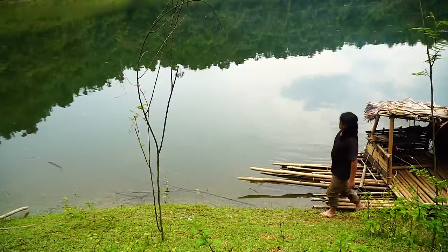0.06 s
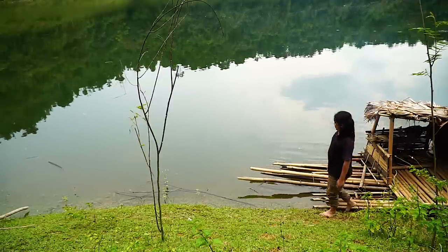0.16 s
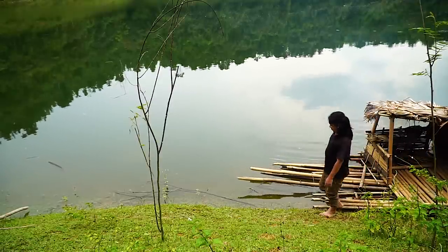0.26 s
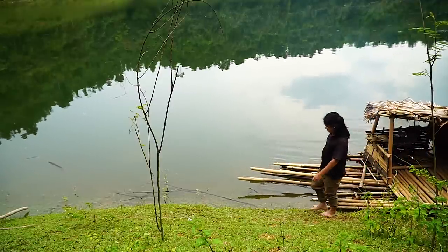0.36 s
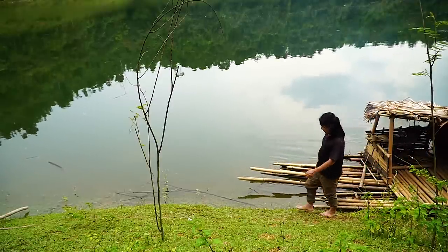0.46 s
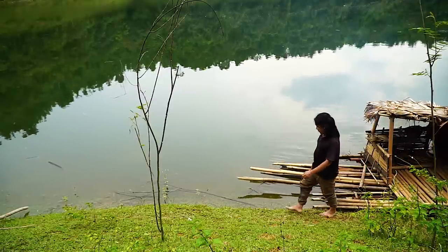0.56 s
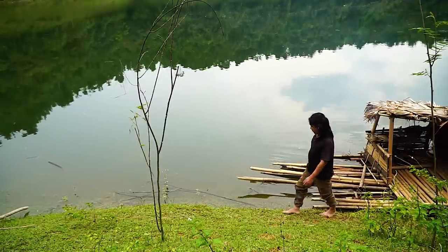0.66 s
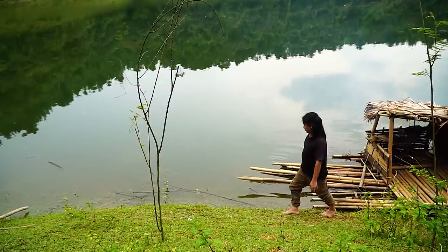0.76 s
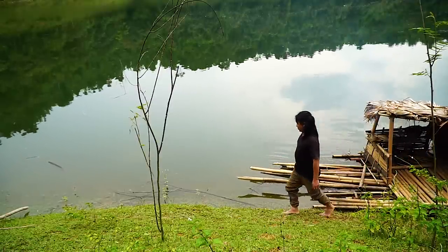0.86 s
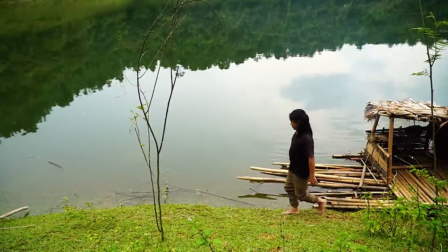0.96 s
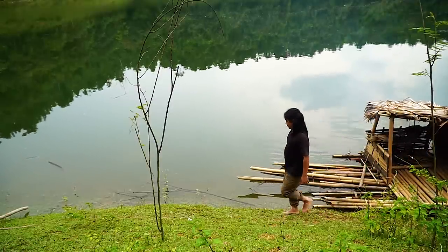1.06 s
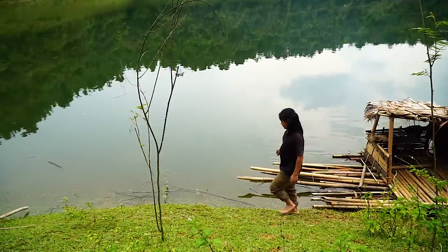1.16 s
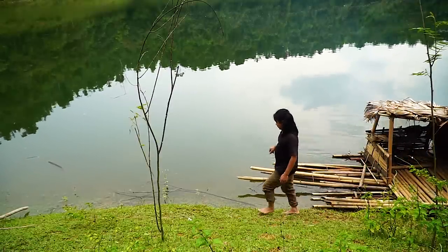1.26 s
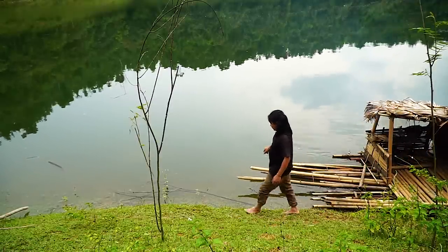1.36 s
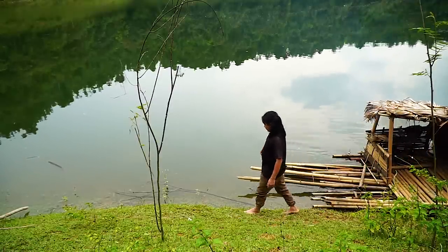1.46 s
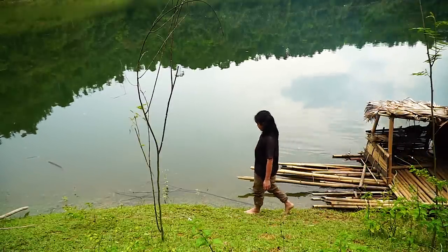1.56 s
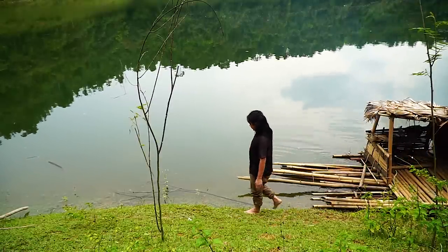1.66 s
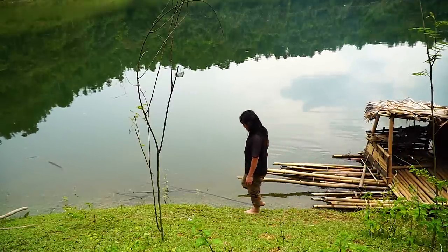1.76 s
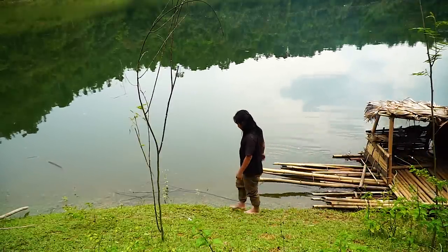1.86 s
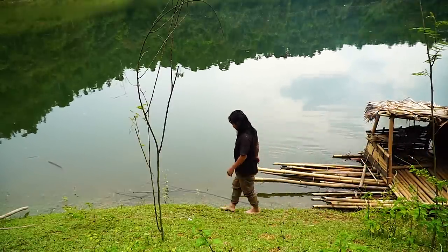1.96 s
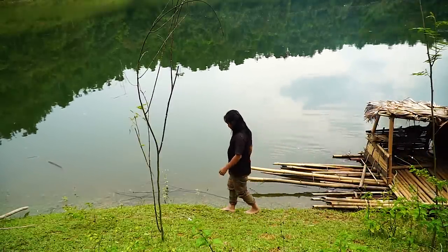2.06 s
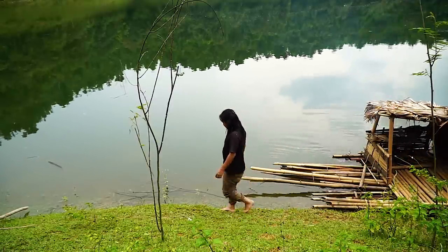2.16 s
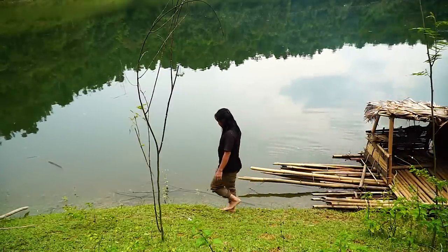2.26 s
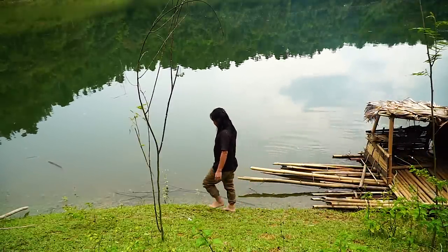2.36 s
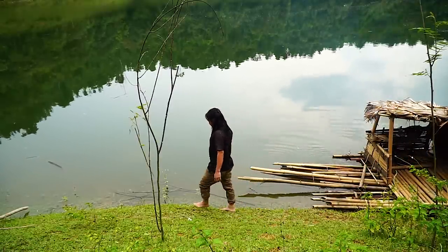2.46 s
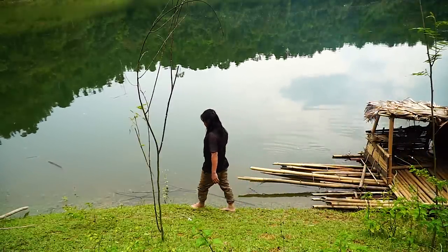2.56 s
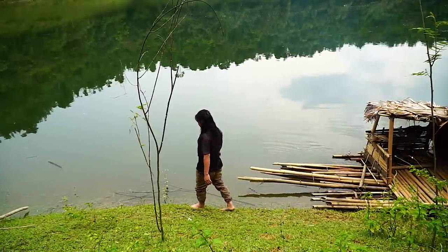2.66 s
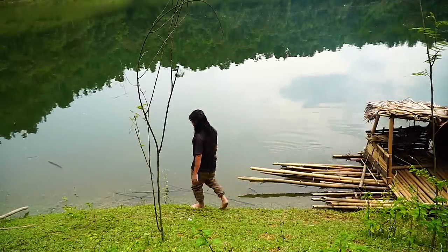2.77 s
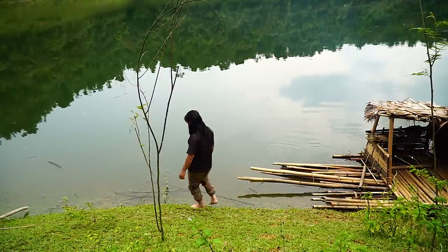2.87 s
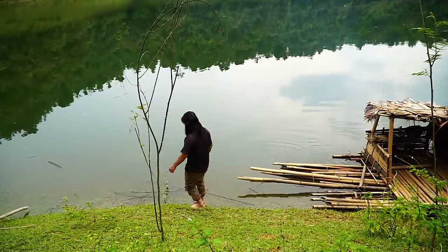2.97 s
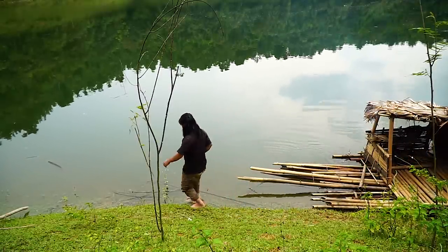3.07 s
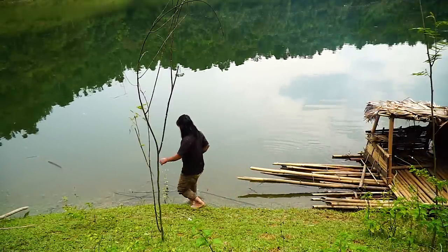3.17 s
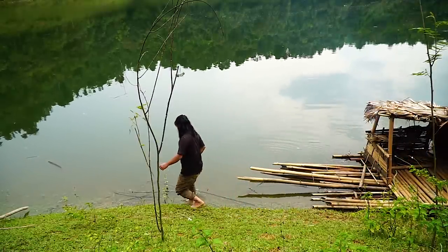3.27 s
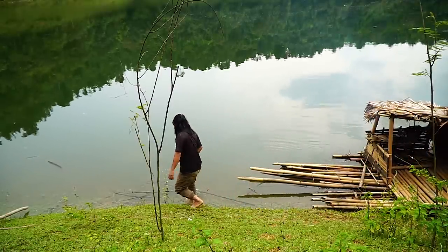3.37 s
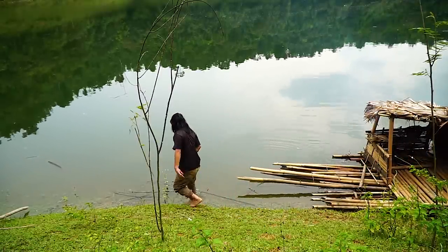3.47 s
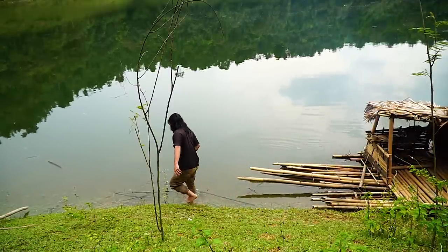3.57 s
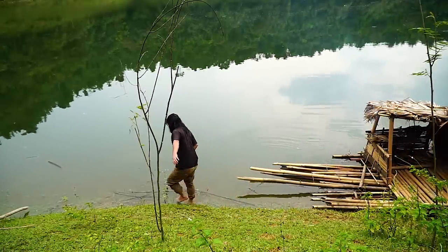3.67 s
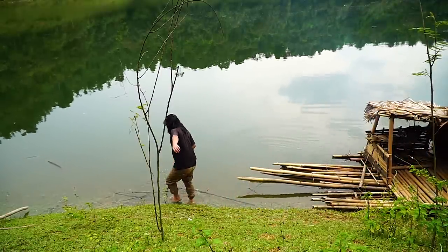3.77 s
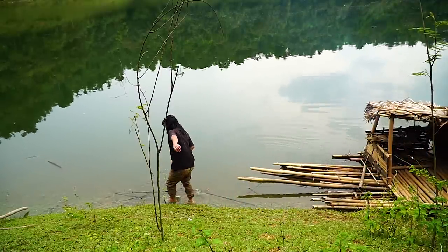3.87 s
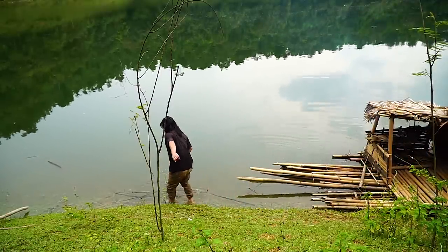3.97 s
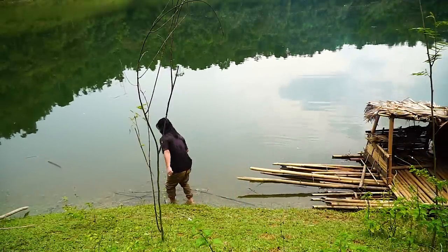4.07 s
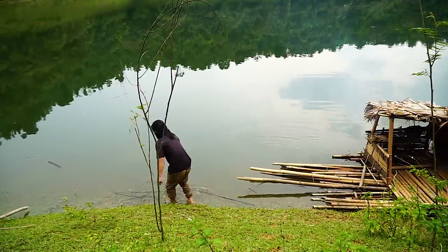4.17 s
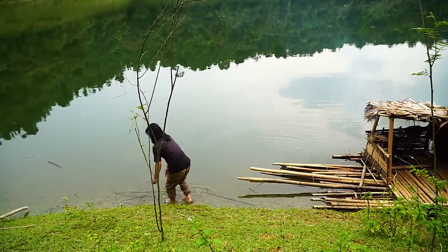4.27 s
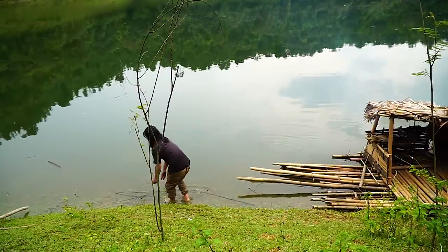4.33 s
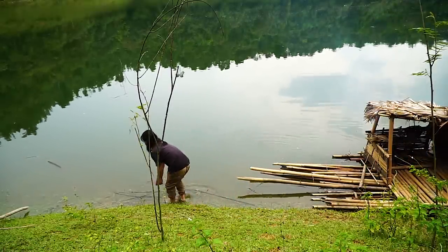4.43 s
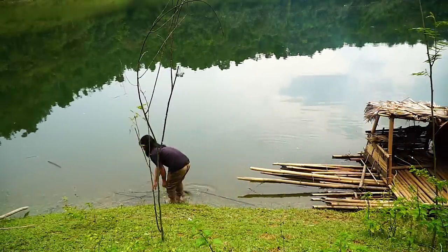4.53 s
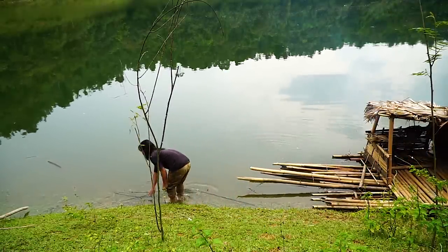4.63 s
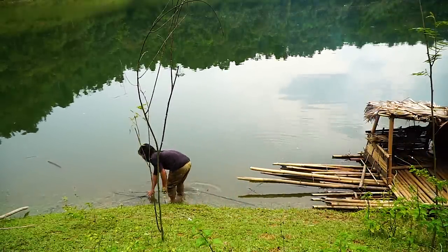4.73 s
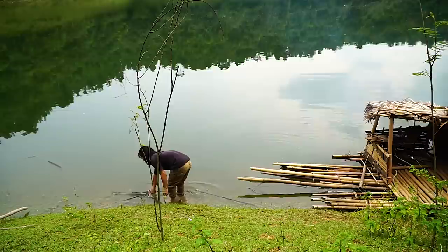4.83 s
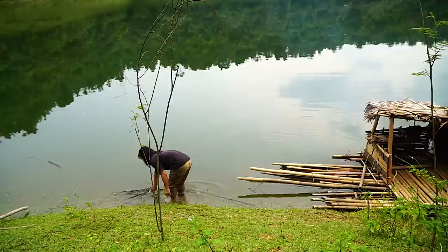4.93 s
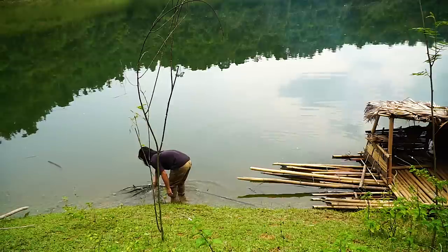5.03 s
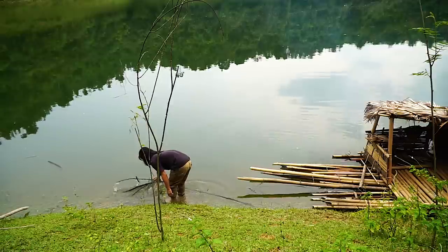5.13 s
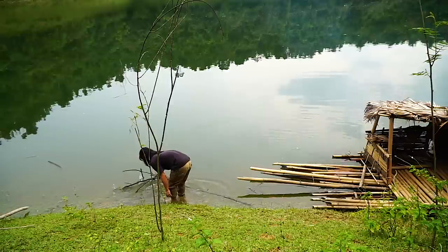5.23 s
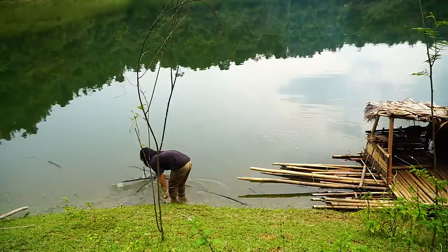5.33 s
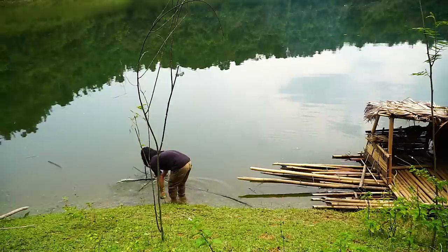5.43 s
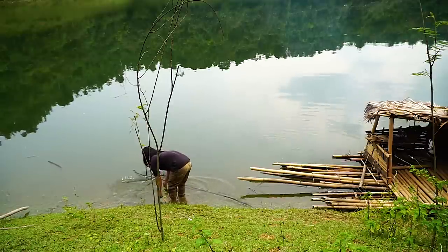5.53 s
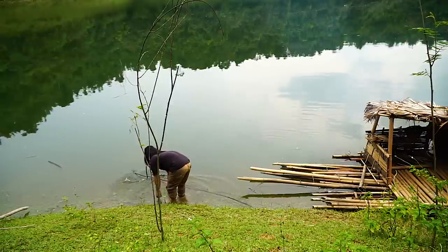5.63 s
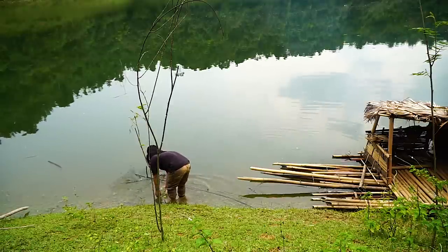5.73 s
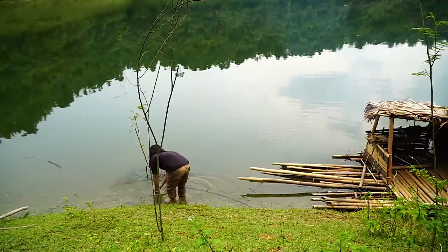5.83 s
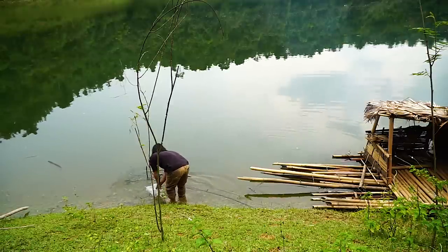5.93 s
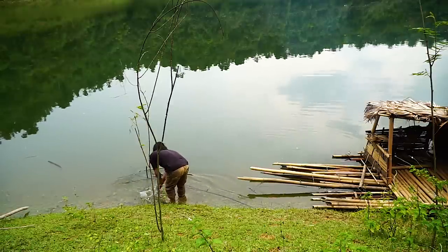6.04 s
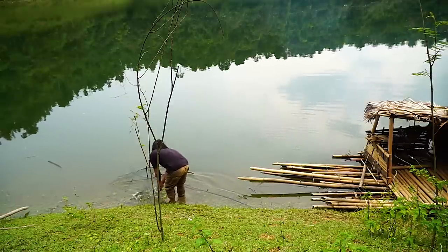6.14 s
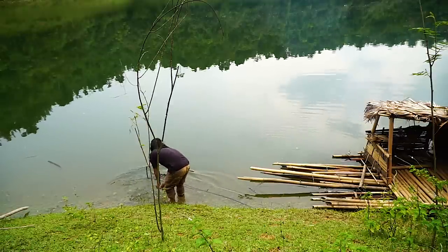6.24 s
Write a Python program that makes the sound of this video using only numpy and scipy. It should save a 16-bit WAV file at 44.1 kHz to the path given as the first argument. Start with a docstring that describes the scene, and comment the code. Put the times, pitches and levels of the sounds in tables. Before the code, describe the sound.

On a quiet outdoor shore, a near insect chirps rapidly over a faint insect chorus and still air. Faint barefoot thuds and grass rustle come first, then a quick splash as feet enter water at about three seconds. Drips, trickling and faint bird notes follow, before hands swish the shallows in fuller, gurgling sloshes until the end. The microphone is fairly near, with little echo.

```python
"""A quiet lake shore: someone walks barefoot down a grassy bank, steps in and swishes something in the shallows.
The water is made of ringing bubbles, low in the slosh and high in the splash, with noise for spray, slaps and drops.
Filtered noise brushes like cloth and grass, and the feet thud softly. A near insect chirps nine times a second.
A far bird, an insect chorus, still air and a breeze lie behind. The ground reflects the water to the microphone."""
import sys
import numpy as np
from scipy import signal
from scipy.fft import rfft, irfft
from scipy.io import wavfile
from scipy.ndimage import uniform_filter1d

SR = 44100
rng = np.random.default_rng(int(sys.argv[2]) if len(sys.argv) > 2 else 0)


def to_wav(sig):
    """Store sig (one row per channel, or 1-D mono) as 16-bit WAV at the path in sys.argv[1].

    Samples outside -1..1 are clipped; the rate is SR.
    """
    pcm = np.clip(np.atleast_2d(sig), -1, 1) * 32767
    pcm = np.round(pcm).astype(np.int16)
    wavfile.write(sys.argv[1], SR, pcm.T)  # frames by channels


N = 277830  # length of the scene [samples]
PUSH_ATTACK_S = 0.031  # time a push through the water takes to climb its last 20 dB


def undb(db):
    """Turn decibels into a gain."""
    return 10 ** (np.asarray(db) / 20)


def unit(x):
    """Scale a sound to an rms of 1."""
    return x / np.sqrt(np.mean(x ** 2))


def add(out, s, sound):
    """Mix a sound in at time s, cut off where the scene ends."""
    i = int(np.clip(s * SR, 0, N))
    out[i:i + len(sound)] += sound[:N - i]


def noise():
    """White noise as long as the scene: every pitch at once."""
    return rng.standard_normal(N)


def colour(x, points):
    """Filter x by a curve of (pitch [Hz], gain [dB]) points."""
    hz, db = np.transpose(points)
    f = np.maximum(np.fft.rfftfreq(N, 1 / SR), 1)
    gain = undb(np.interp(np.log(f), np.log(hz), db))
    return irfft(rfft(x) * gain, N)


def band(x, lo_hz, hi_hz, order=2):
    """Keep the pitches between two edges, with gentle slopes outside them."""
    edges = [lo_hz, min(hi_hz, SR / 2 - 1)]
    return signal.sosfilt(signal.butter(order, edges, "band", fs=SR, output="sos"), x)


def wander(rate):
    """A smooth random curve with spread 1, drawing about `rate` new values a second."""
    k = int(SR / rate)
    stairs = np.repeat(rng.standard_normal(N // k + 1), k)
    return unit(uniform_filter1d(stairs, k)[:N])


def gesture(s, attack, hold, release):
    """Power of one movement: full from s through the hold, 20 dB down one attack before and one release after."""
    t = np.arange(N) / SR - s
    away = np.maximum(-t, 0) / attack + np.maximum(t - hold, 0) / release
    return undb(-20 * np.minimum(away, 10)) ** 2


def bubble(hz, cycles, rise, swell=0.14, pinch=0):
    """A dying ring, peak about 1; its pitch settles after a bubble pinches off and climbs near the surface."""
    pinch_cycles = 4.2  # how long the pitch takes to settle
    cycles = max(cycles, 2)  # until 60 dB down
    turns = np.arange(int(cycles / hz * SR)) * hz / SR
    age = turns / cycles
    envelope = (1 - np.exp(-turns / swell)) * np.exp(-np.log(1000) * age)
    settling = pinch * pinch_cycles * (1 - np.exp(-turns / pinch_cycles))
    phase = turns * (1 - pinch / 2 + rise * age / 2) + settling
    return envelope / envelope.max() * np.sin(2 * np.pi * phase)


def burst(t60, lo_hz, hi_hz, order=2):
    """A short noise with peak 1, dying by 60 dB in t60 seconds."""
    t = np.arange(SR // 8) / SR
    dying = rng.standard_normal(len(t)) * np.exp(-np.log(1000) * t / t60)
    y = band(dying, lo_hz, hi_hz, order)
    return y / np.abs(y).max()


def cloud(db, lowest, hi_hz, cycles, rise, swell, scatter_db, busy_db, tilt_db, count):
    """Up to count bubbles a second at a level near db; below busy_db, calmer water makes fewer of them."""
    out, total = np.zeros(N), count * N // SR
    when, keep, size, life, loud = rng.random((total, 5)).T
    at = ((np.arange(total) + when) / total * (N - 1)).astype(int)
    share = np.minimum(1, undb(db[at] - busy_db))
    hz = np.broadcast_to(lowest, N)[at] ** (1 - size) * hi_hz ** size
    # scatter makes bubbles uneven; tilt favours the high ones, or the low ones if negative
    gain = undb(db[at] + scatter_db * (2 * loud - 1) + tilt_db * (size - .5))
    for k in np.flatnonzero(keep < share):
        ring = bubble(hz[k], cycles * 2 ** (2 * life[k] - 1), rise * 2 * life[k], swell)
        # fewer or shorter rings are each made louder, to hold the level
        even = np.sqrt(SR / (count * share[k] * np.sum(ring ** 2)))
        add(out, at[k] / SR, gain[k] * even * ring)
    return out


def water():
    """Big bubbles slosh, small ones splash, spray crackles, drops fall back."""
    slosh_db, splash_db, spray_db, lowest = stirring()
    moving = sloshing(slosh_db, lowest) + splashing(splash_db) + spraying(spray_db)
    return moving + trickle() + plunging() + single_bubbles() + slapping() + dripping()


def stirring():
    """Each push swells and settles; returns slosh, splash and spray in dB and the pitch of the biggest air pockets."""
    # a foot or hand pushes through the water: (time [s], hold [s], release [s],
    # slosh level [dB], splash level [dB], spray level [dB], lowest bubble pitch [Hz])
    pushes = [(3.069, 0.017, 0.04, -65, -54, -65, 670), (3.095, 0.018, 0.038, -42.5, -48, -83, 498),
              (3.151, 0.051, 0.031, -45, -52.5, -71.5, 617), (3.24, 0.027, 0.072, -57, -57, -82, 710),
              (3.354, 0.056, 0.038, -59.5, -63, -70.5, 684), (4.575, 0.026, 0.42, -50, -60, -73.5, 400),
              (4.695, 0.01, 0.26, -55, -62, -73.5, 560), (4.78, 0.09, 0.059, -67, -62.5, -77, 570),
              (4.895, 0.068, 0.031, -40, -52, -69, 513), (4.972, 0.15, 0.22, -39, -50.5, -66, 392),
              (5.157, 0.061, 0.21, -36.5, -50, -64, 372), (5.271, 0.086, 0.12, -43.5, -51, -65, 526),
              (5.398, 0.0081, 0.45, -66, -57, -66.5, 640), (5.507, 0.08, 0.3, -65.5, -60.5, -68.5, 610),
              (5.757, 0.012, 0.058, -40.5, -49, -77, 530), (5.793, 0.02, 0.066, -38.5, -50, -70, 444),
              (5.897, 0.0023, 0.018, -45, -59, -55, 460), (5.93, 0.008, 0.089, -42.5, -57, -57.5, 450),
              (5.967, 0.054, 0.061, -43.5, -50, -58.5, 570), (6.05, 0.065, 0.11, -49, -50.5, -56.5, 650),
              (6.148, 0.045, 0.11, -43.5, -53.5, -53.5, 706), (6.242, 0.014, 0.13, -59, -53, -75, 720)]
    power = np.array([gesture(s, PUSH_ATTACK_S, hold, release) for s, hold, release, *_ in pushes])
    *_, slosh, splash, spray, lowest = np.transpose(pushes)
    slosh_db, splash_db, spray_db = (10 * np.log10(undb(db) ** 2 @ power) for db in (slosh, splash, spray))
    return slosh_db, splash_db, spray_db, lowest @ power / power.sum(axis=0)


def sloshing(slosh_db, lowest):
    """Large bubbles ring low and long, over a dull noise from the bulk of the moving water."""
    out = undb(-5.5) * cloud(slosh_db, lowest, hi_hz=1056, cycles=16.1, rise=0.34, swell=1.74,
                             scatter_db=4.0, busy_db=-54, tilt_db=2.5, count=340)
    churn = unit(band(noise(), 177, 1100))
    return out + undb(slosh_db - 44.0 + 2.2 * wander(30)) * churn


def splashing(splash_db):
    """Small bubbles ring high; the finest fizz, lone droplets tick and tearing water hisses."""
    out = undb(-4.5) * cloud(splash_db, lowest=1280, hi_hz=4045, cycles=32, rise=0.24, swell=0.58,
                             scatter_db=12, busy_db=-52, tilt_db=-3, count=650)
    # the finest bubbles fizz above the splash
    out += undb(-17.5) * cloud(splash_db, lowest=4380, hi_hz=7040, cycles=54, rise=0.24, swell=1.0,
                               scatter_db=15.5, busy_db=-44.5, tilt_db=-8.0, count=550)
    # lone droplets tick above the churn
    ticks = cloud(np.zeros(N), lowest=4200, hi_hz=15000, cycles=6, rise=0, swell=0.3,
                  scatter_db=10, busy_db=0, tilt_db=0, count=80)
    out += undb(splash_db - 21) * ticks
    # tearing water: bubbles too many to tell apart
    rough = noise() * undb(4 * wander(700) + 2.5 * wander(70))
    return out + undb(splash_db - 11.5) * unit(band(rough, 1120, 3540))


def spraying(spray_db):
    """Spray crackles as uneven noise, and its droplets patter back, each a tiny ping."""
    # tone of the spray: (pitch [Hz], gain [dB])
    spray_tone = [(200, -7), (1500, 11), (4000, 10), (6000, 5), (9000, -3), (16000, -3.5)]
    crackle = unit(noise() * undb(2.5 * wander(1500) + 2 * wander(160)))
    out = undb(spray_db + 3.5) * colour(crackle, spray_tone)
    patter = cloud(spray_db, lowest=2600, hi_hz=14300, cycles=41, rise=0, swell=0.3,
                   scatter_db=12, busy_db=-58.5, tilt_db=-9, count=900)
    return out + undb(-1.5) * patter


def trickle():
    """Water trickles off the legs between the steps, as a thin cloud of small bubbles."""
    power = gesture(3.5, PUSH_ATTACK_S, hold=0.53, release=0.23)
    return cloud(-71.5 + 10 * np.log10(power), lowest=1500, hi_hz=4220, cycles=30, rise=0.32, swell=0.92,
                 scatter_db=8, busy_db=-66.5, tilt_db=5, count=160)


def plunging():
    """A hand plunges in with a dull thump: a burst of low noise."""
    plunges = [(4.58, -50), (5.068, -49), (5.897, -55), (5.929, -53), (6.19, -55)]  # (time [s], peak level [dB])
    out = np.zeros(N)
    for s, db in plunges:
        add(out, s, undb(db) * burst(t60=0.06, lo_hz=130, hi_hz=340))
    return out


def single_bubbles():
    """Single bubbles stand out; small ones start sharp and settle as they sink, big ones climb in pitch."""
    # single bubbles that stand out, large and small:
    # (time [s], pitch [Hz], level [dB], length [cycles until silent])
    bubbles = [(3.049, 2420, -33.5, 33), (3.092, 1760, -24, 6.9), (3.103, 1055, -26, 29),
               (3.1043, 2100, -23, 4.7), (3.148, 724, -32, 29), (3.163, 870, -28, 19),
               (3.164, 1640, -22.5, 4.4), (3.178, 1370, -32.5, 27), (3.183, 2440, -38, 28),
               (3.208, 820, -33, 18), (3.309, 916, -36.5, 41), (3.358, 2360, -38, 95),
               (3.398, 3100, -32, 14), (3.43, 1025, -45, 44), (3.817, 794, -42, 25),
               (3.826, 1080, -35.5, 4.4), (3.874, 2340, -39, 51), (3.947, 844, -42.5, 19),
               (4.007, 1070, -38.5, 21), (4.022, 2180, -45, 43), (4.139, 3310, -42, 56),
               (4.306, 1200, -47, 49), (4.557, 2440, -33.5, 3.6), (4.581, 452, -44, 51),
               (4.617, 2770, -38, 45), (4.691, 639, -31.5, 29), (4.692, 1260, -30.5, 8.7),
               (4.703, 2110, -41.5, 28), (4.77, 2050, -43, 35), (4.797, 884, -37.5, 25),
               (4.840, 700, -36, 26), (4.895, 610, -30, 18), (4.908, 970, -26.5, 11),
               (4.963, 1000, -27.5, 37), (5.04, 1610, -32.5, 38), (5.092, 866, -32.5, 51),
               (5.125, 3660, -32, 22), (5.129, 1880, -28.5, 24), (5.159, 947, -18.5, 9.3),
               (5.181, 2630, -26, 20), (5.198, 620, -29, 12), (5.206, 2760, -27.5, 14),
               (5.222, 510, -37, 14), (5.231, 904, -25, 21), (5.233, 425, -26, 22), (5.306, 665, -33, 43),
               (5.316, 1600, -30, 16), (5.325, 4200, -29.5, 35), (5.409, 905, -37.5, 66),
               (5.413, 5400, -31, 25), (5.53, 2620, -31.5, 15), (5.534, 2700, -29, 11),
               (5.549, 2540, -32, 17), (5.563, 5300, -34, 31), (5.592, 783, -37.5, 21),
               (5.593, 5400, -24, 15), (5.615, 2340, -29, 11.5), (5.749, 1440, -32.5, 13),
               (5.873, 3500, -33, 27), (5.762, 526, -30, 11), (5.793, 727, -26, 24),
               (5.804, 638, -24.5, 17), (5.820, 575, -32, 28), (5.929, 900, -23.5, 14),
               (5.966, 900, -27, 15), (6.002, 3740, -29.5, 41), (6.005, 652, -32, 58),
               (6.018, 723, -28.5, 21), (6.040, 3120, -27.5, 26), (6.049, 2220, -30.5, 41),
               (6.064, 1010, -29, 23), (6.098, 2760, -31, 72), (6.135, 815, -30.5, 19),
               (6.15, 2200, -25, 32), (6.182, 5230, -23, 24), (6.163, 767, -37, 60), (6.202, 2970, -30, 25),
               (6.244, 768, -31.5, 32), (6.262, 852, -39, 57), (6.291, 2700, -36, 45)]
    small_hz = 1500  # bubbles pitched above this count as small
    out = np.zeros(N)
    for s, hz, db, cycles in bubbles:
        ring = bubble(hz, cycles, rise=0.18 * (hz < small_hz), swell=0.82, pinch=0.147 * (hz > small_hz))
        add(out, s, undb(db - 3) * ring)  # all 3 dB under the table
    return out


def slapping():
    """Skin slaps flat on the water: a short burst of middle-pitched noise."""
    slaps = [(3.054, -38), (3.074, -44), (3.089, -34.5), (3.188, -38), (3.239, -44), (3.41, -40),
             (5.741, -37.5), (5.899, -36), (5.928, -35)]  # (time [s], peak level [dB])
    out = np.zeros(N)
    for s, db in slaps:
        add(out, s, undb(db) * burst(t60=0.045, lo_hz=835, hi_hz=4120))
    return out


def dripping():
    """Drops smack the surface: very short bursts of bright noise."""
    drops = [(2.769, -33.5, 11000), (2.963, -34, 11100), (3.05, -26, 6960), (3.162, -32, 11000),
             (3.191, -34, 8000), (3.27, -30.5, 8000), (3.366, -28.5, 5960), (3.403, -28, 9000),
             (3.818, -28.5, 12000), (3.848, -36, 12000), (3.873, -27.5, 7800), (3.894, -29.5, 10500),
             (3.904, -35, 13000), (4.007, -27, 11400), (4.03, -34.5, 11000), (4.206, -33.5, 5000),
             (4.231, -41, 8800), (4.579, -34, 6000), (4.633, -31, 8950), (4.649, -34, 7900),
             (4.839, -35, 10900), (5.037, -25, 5470), (5.05, -39, 13000), (5.065, -28.5, 14000),
             (5.529, -28, 6200), (5.547, -26, 6960), (5.594, -20.5, 12000), (5.872, -34, 4500),
             (5.907, -28, 8000), (5.932, -27, 6960), (6.098, -21, 8000), (6.182, -17, 8900)]  # (time [s], level [dB], upper edge [Hz])
    out = np.zeros(N)
    for s, db, hz in drops:
        add(out, s, undb(db - 9.0) * burst(t60=0.012, lo_hz=2040, hi_hz=hz, order=1))  # 9 dB under the table
    return out


def walker():
    """Cloth and grass brush as noise; the feet thud softly and crush the blades."""
    # a trouser leg or a foot brushes the grass: (time [s], hold [s], release [s], level [dB])
    brushes = [(0, 1.27, 0.054, -81), (0.24, 0.019, 0.031, -76), (0.765, 0.034, 0.033, -73),
               (0.962, 0.015, 0.038, -71.5), (1.05, 0.019, 0.067, -76), (1.41, 1.16, 0.06, -82.5),
               (1.475, 0.13, 0.19, -76), (1.7, 0.0091, 0.033, -73), (2.062, 0.078, 0.14, -74.5),
               (2.21, 0.077, 0.071, -73), (2.444, 0.059, 0.13, -78.5), (2.71, 0.16, 0.06, -72),
               (2.85, 0.65, 0.1, -81), (3.548, 0.012, 0.018, -67.5)]
    # tone of the rustle: (pitch [Hz], gain [dB])
    rustle_tone = [(300, 3.5), (900, 17.5), (1400, 7.5), (3200, 17.5), (5500, 17), (10000, 8), (16000, 6)]
    # bare feet on the turf: (time [s], pitch of the thud [Hz], level [dB])
    steps = [(.312, 1500, -44), (.480, 840, -51), (.519, 530, -45.5), (0.524, 887, -44.5),
             (0.609, 2160, -48.5), (1.898, 94, -49.5), (2.03, 390, -50), (2.18, 547, -47),
             (2.243, 870, -43), (2.422, 472, -51.5)]
    # a sole crushes a tuft of grass: (time [s], level [dB])
    crunches = [(.972, -60), (1.261, -56.5), (2.426, -55)]
    brush_attack_s, crunch_s = 0.07, 0.03

    fibres = unit(noise() * undb(2.4 * wander(1200) + 1.8 * wander(110)))
    power = sum(undb(db) ** 2 * gesture(s, brush_attack_s, hold, release) for s, hold, release, db in brushes)
    out = np.sqrt(power) * colour(fibres, rustle_tone)
    for s, hz, db in steps:
        add(out, s, undb(db - 5) * bubble(hz, cycles=1.13 * np.sqrt(hz), rise=0))  # 5 dB under the table
    # a foot rolls onto the blades and off again
    pressure = np.zeros(N)
    for s, db in crunches:
        add(pressure, s - crunch_s / 2, undb(db) * np.hanning(int(crunch_s * SR)))
    return out + pressure * unit(band(fibres, 2460, 6050))


def insect():
    """Each wing stroke is a falling whistle with an octave; strokes differ a little in length, pitch and force."""
    # the near insect keeps time: (time [s], chirps so far)
    beat = [(.0352, 0), (1.9197, 17), (2.036, 18), (2.925, 26), (3.589, 32), (5.477, 49), (6.250, 56)]
    # one wing stroke: (time from its start [s], pitch [Hz], level [dB])
    stroke = [(0, 8500, -22), (.002, 7820, -6), (.004, 7710, -.6), (.0072, 7640, 0), (.011, 7520, -9),
              (.0145, 7500, -8), (.0175, 7470, -13), (.0195, 7460, -30), (.023, 7520, -21),
              (.027, 7480, -32)]
    wing_return_s = .064
    s, number = np.transpose(beat)
    at, hz, db = np.transpose(stroke)
    out = np.zeros(N)
    for start in np.interp(np.arange(number[-1] + 1), number, s):
        pitch, loud, slow, late = rng.standard_normal(4)
        age = np.linspace(0, 1, int(at[-1] * SR * np.exp(.05 * slow)))
        stroke_hz = np.interp(age * at[-1], at, hz) * (1 + .0015 * pitch)
        phase = 2 * np.pi * np.cumsum(stroke_hz) / SR
        envelope = undb(np.interp(age * at[-1], at, db) + 2 * late * age)
        # the octave comes out late in the stroke
        octave = undb(-6) * age ** 2 * np.sin(2 * phase)
        chirp = envelope * (np.sin(phase) + octave)
        add(out, start, undb(-46.5 + 0.23 * loud) * chirp)
        # the wings sound faintly on their way back
        add(out, start + wing_return_s, undb(-67 + 2 * loud) * chirp)
    return out * undb(0.29 * wander(600))


def bird():
    """Quick upward sweeps and level whistles from far away, each a sine that swells and fades."""
    # rising notes: (time [s], starting pitch [Hz], level [dB])
    sweeps = [(3.584, 3280, -63), (3.613, 2940, -61), (3.724, 3060, -64), (3.753, 3200, -71),
              (3.906, 3300, -66), (3.936, 3200, -61), (4.06, 2700, -72), (4.36, 2870, -67)]
    # level whistles: (time [s], pitch [Hz], level [dB])
    whistles = [(1.932, 4520, -69), (4.44, 3900, -70.5)]
    out = np.zeros(N)
    # each kind of note has a length [s] and a rise [octaves]
    for notes, length, rise in ((sweeps, 0.0228, .42), (whistles, 0.068, 0)):
        age = np.linspace(0, 1, int(length * SR))
        for s, hz, db in notes:
            phase = 2 * np.pi * np.cumsum(hz * 2 ** (rise * age)) / SR
            add(out, s, undb(db) * np.sin(np.pi * age) * np.sin(phase))
    return out


def shore():
    """Filtered noise for still air, a far insect chorus with top voices in waves, and a breeze on the microphone."""
    # tone of the quiet air: (pitch [Hz], gain [dB])
    air_tone = [(10, -44), (30, -52), (70, -50), (130, -50.5), (250, -54.5), (450, -53.5), (620, -57.5),
                (900, -54.5), (1400, -63), (3500, -62), (5500, -69.5), (10000, -73.5), (16000, -77)]
    # tone of the distant insects: (pitch [Hz], gain [dB])
    chorus_tone = [(5600, -100), (6250, -70.5), (6700, -60), (6950, -60), (7250, -60.5), (7800, -67),
                   (8300, -72), (9200, -100)]
    air = undb(.5 * wander(12.0)) * colour(noise(), air_tone)
    chorus = undb(2.3 * wander(45)) * colour(noise(), chorus_tone)
    breeze = undb(-64 + 3.5 * wander(3.58)) * unit(band(noise(), 7.0, 16.5))
    return air + chorus + breeze + shrill_voices()


def shrill_voices():
    """Some far insects grow louder and shriller in slow waves: a narrow noise whose pitch and level move together."""
    crest_s, period_s = 0.68, 0.895
    lowest_hz, climb_hz, half_width_hz = 7680, 318, 280
    t = np.arange(N) / SR
    wave = np.cos(np.pi * (t - crest_s) / period_s) ** 4
    voices = band(noise() + 1j * noise(), 1, half_width_hz)
    # turning the slow complex noise lifts it up to the moving pitch
    turning = np.exp(2j * np.pi * np.cumsum(lowest_hz + climb_hz * wave) / SR)
    return undb(-71) * (1 + wave) / 2 * unit(np.real(voices * turning))


def bank(x, lag=0.000353, bounce=0.25, scatter_db=-17, t60=0.12):
    """The ground returns the sound after lag seconds, hollowing it near 1.4 kHz; plants scatter a short tail."""
    t = np.arange(N) / SR
    tail = band(rng.standard_normal(SR // 2) * np.exp(-np.log(1000) * t[:SR // 2] / t60), 325, 12000)
    tail /= np.sqrt(np.sum(tail ** 2))
    reflection = bounce * np.interp(t - lag, t, x)
    return x + reflection + undb(scatter_db) * signal.fftconvolve(x, tail)[:N]


def scene():
    """Everything at one microphone; the plants add a short echo to bird and insect."""
    near_insect = bank(insect(), bounce=0, scatter_db=-20)
    far_bird = undb(1.5) * bank(bird(), scatter_db=-5, t60=0.18)
    return (bank(water()) + walker() + near_insect + far_bird + shore())[None]


def record(dry):
    """The recorder cuts the top steeply above 15850 Hz."""
    return signal.sosfilt(signal.ellip(10, .2, 70, 15850, fs=SR, output="sos"), dry)


dry = scene()
out = record(dry)
to_wav(out)
```